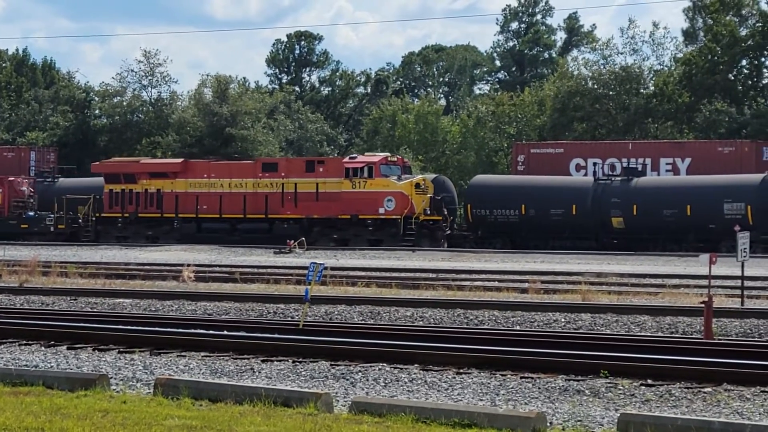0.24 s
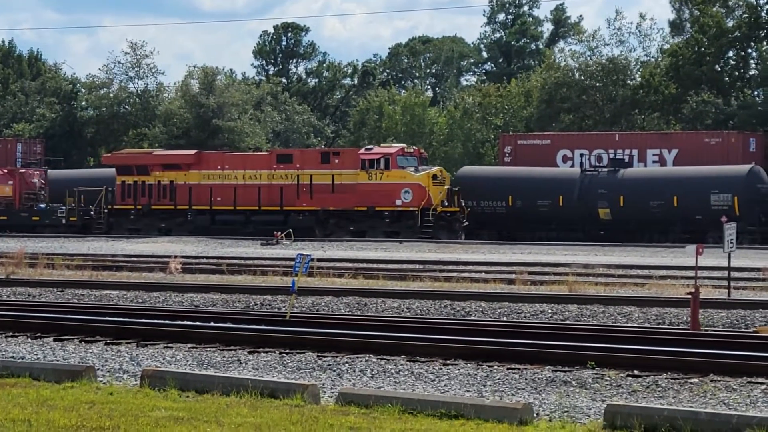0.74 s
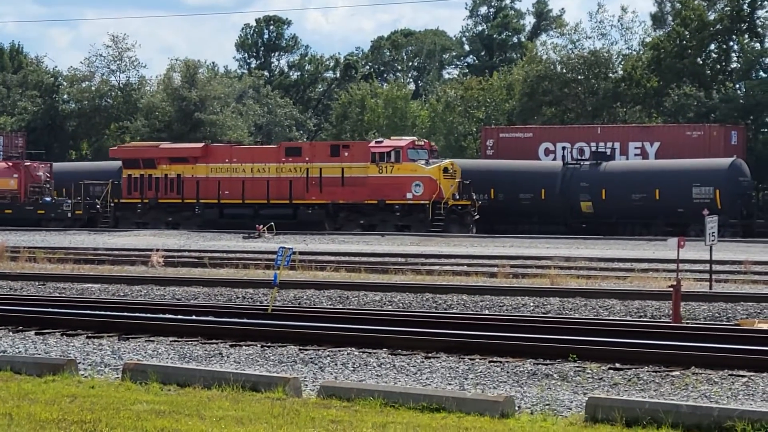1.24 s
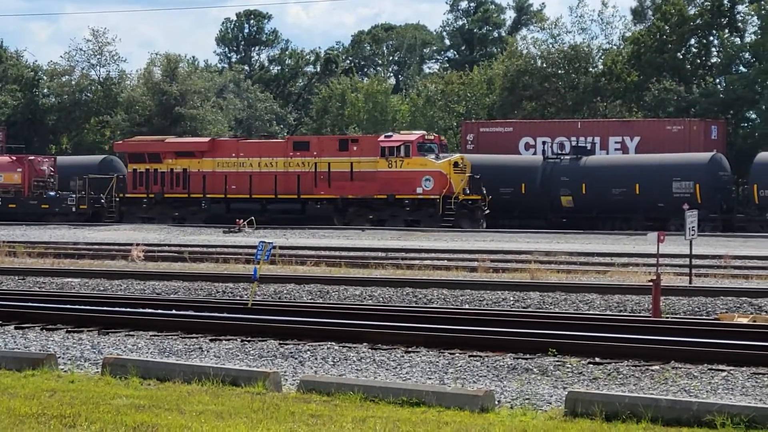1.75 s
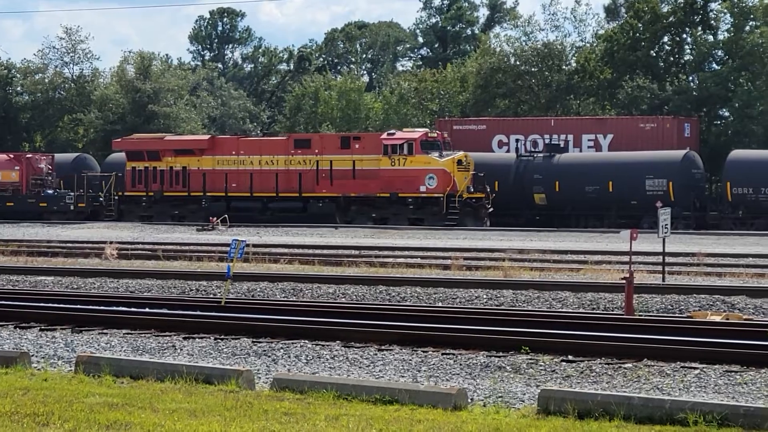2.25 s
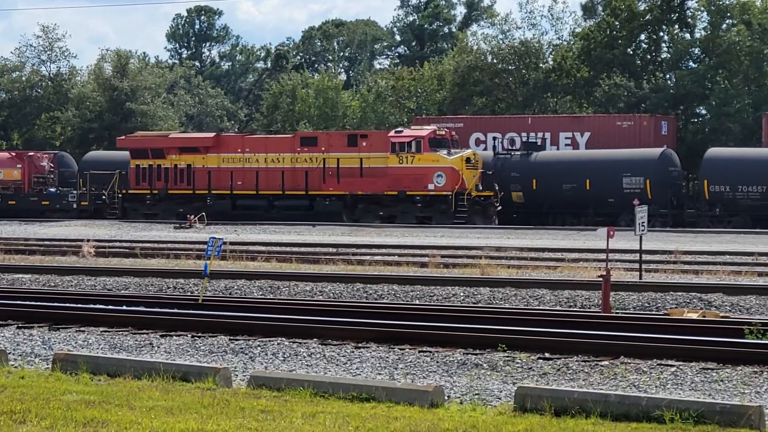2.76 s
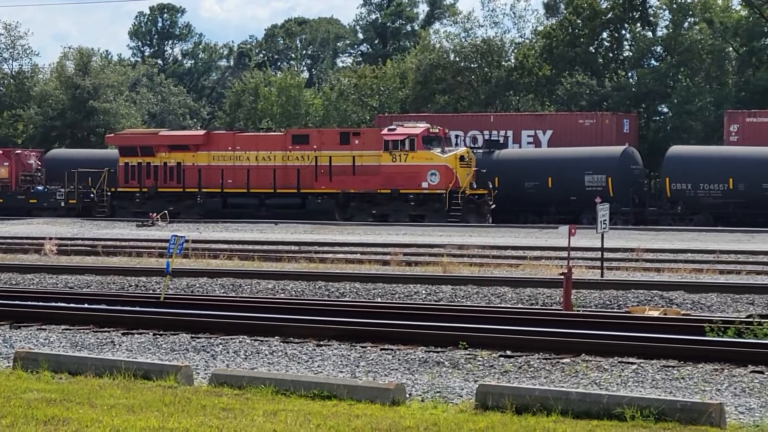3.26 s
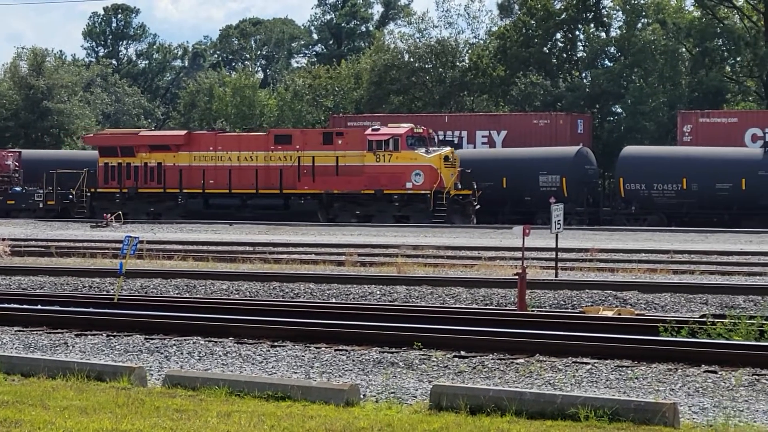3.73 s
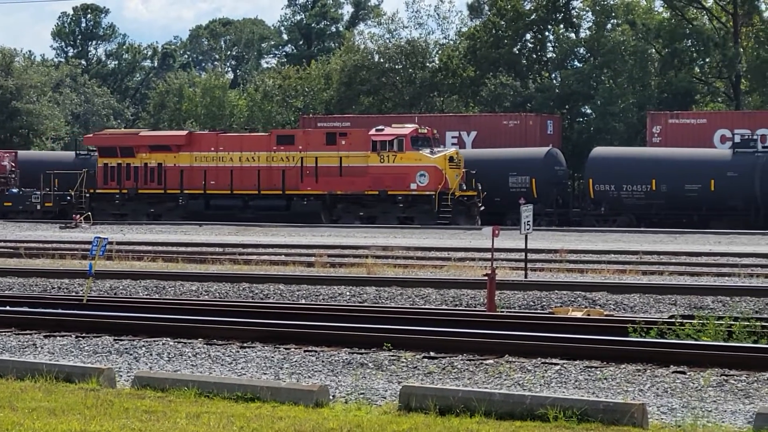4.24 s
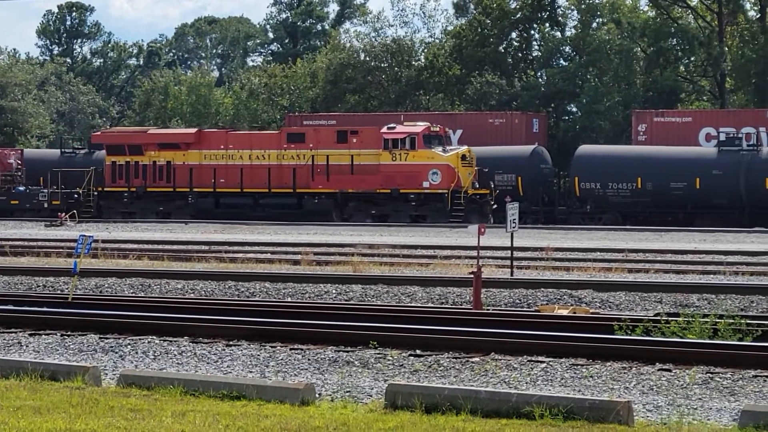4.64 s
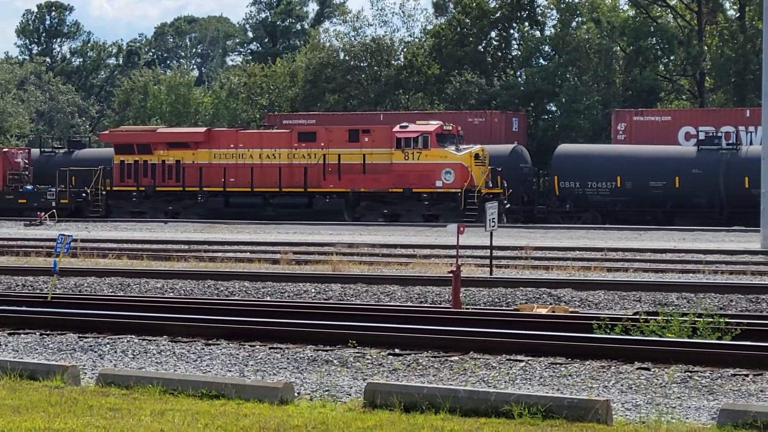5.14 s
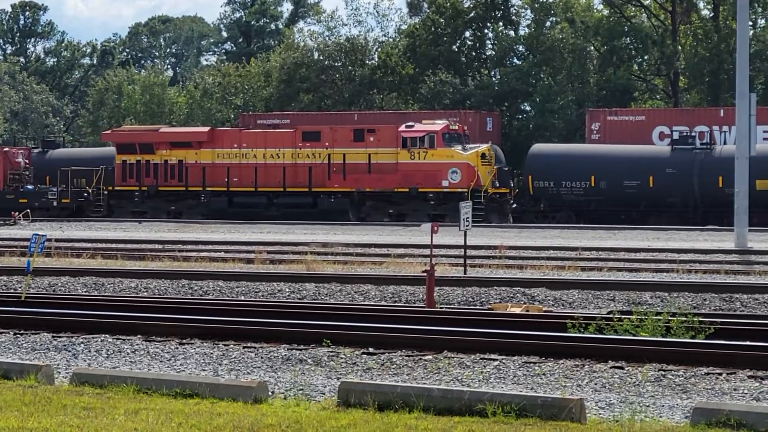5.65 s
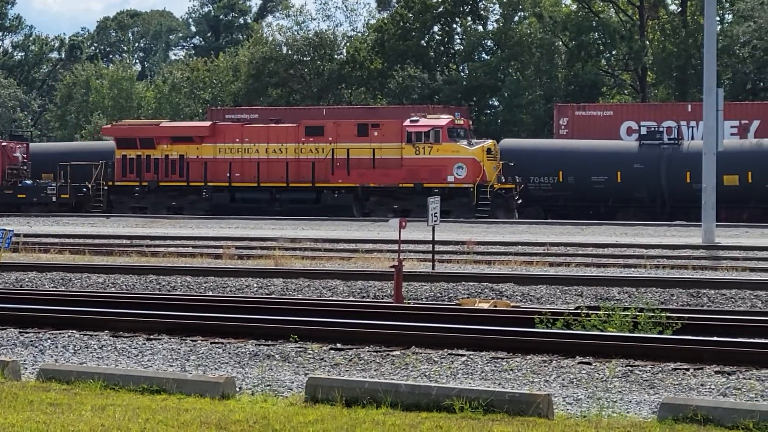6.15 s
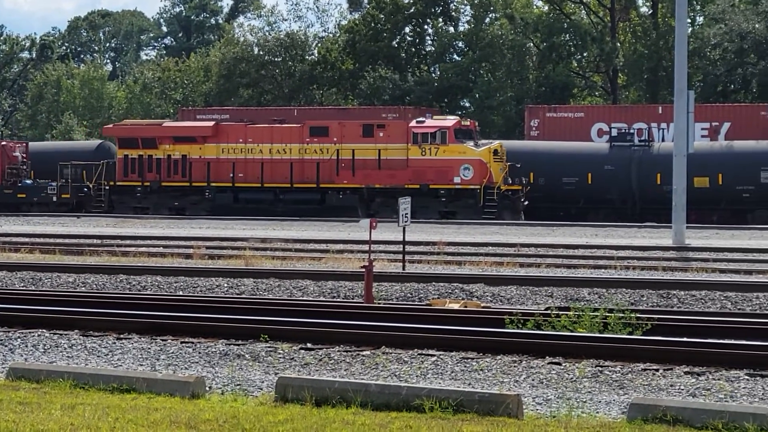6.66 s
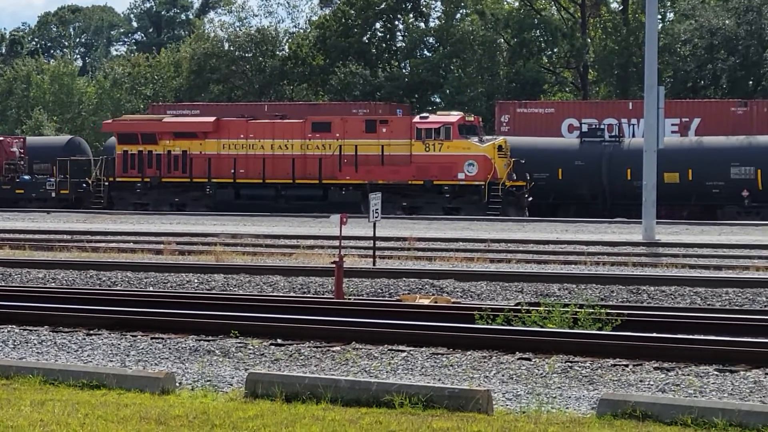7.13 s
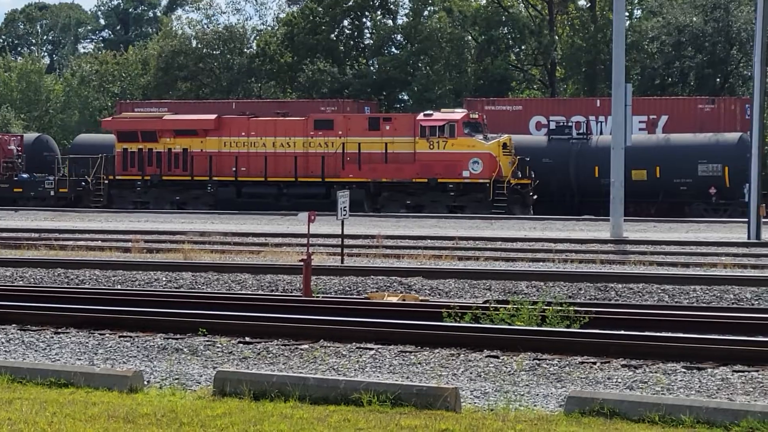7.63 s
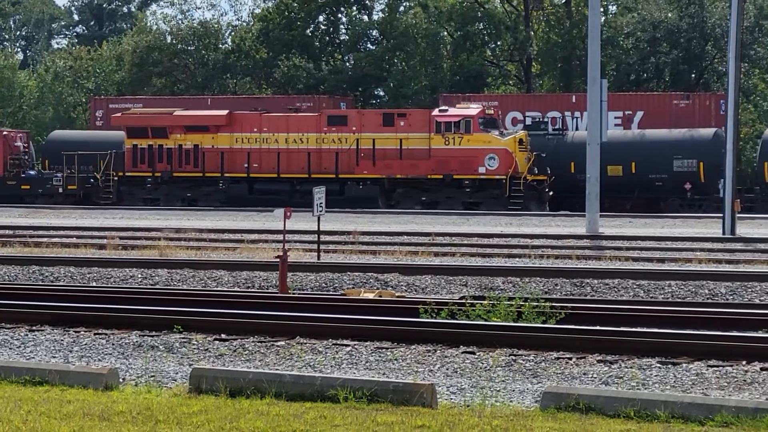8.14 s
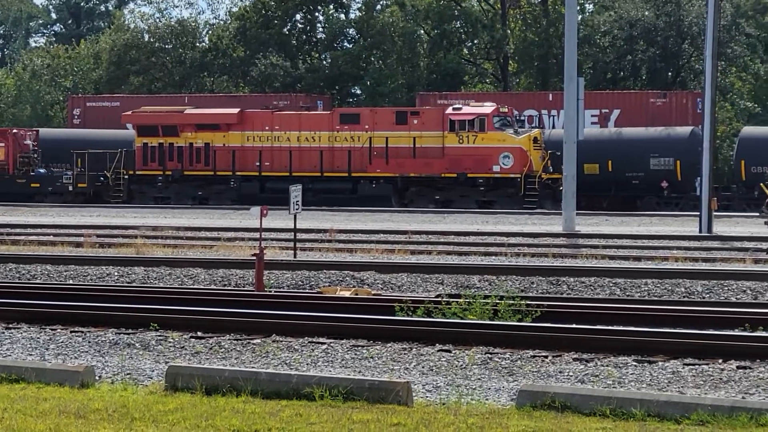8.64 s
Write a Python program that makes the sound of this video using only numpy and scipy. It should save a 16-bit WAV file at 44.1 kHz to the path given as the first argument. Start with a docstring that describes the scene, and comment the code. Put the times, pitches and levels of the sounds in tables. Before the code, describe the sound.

A rolling locomotive and a second diesel engine drone continuously, low and powerful, with uneven puffs about five cycles a second. Steady low hums and a pulsing, slowly climbing gear whine sit in the rumble, with rushing fans and mechanical clatter above. Brief faint flange squeaks come early, strongest around three seconds; a very faint insect hiss flickers on top. Open yard, wide stereo, no speech.

```python
"""In a rail yard, two twelve-cylinder diesel locomotives throb at slightly different speeds. The exhaust of
the rolling one is a train of puffs ringing its stack; it arrives by two paths whose difference grows, so its
strong tones swell and cancel in turn. Shaped noise makes the rumble, fan roar, engine clatter and hiss.
Wandering sines make the steady hums, the rising gear hum and faint wheel squeals; a chopped high hiss and
a thin tone make an insect in the grass."""
import sys
import numpy as np
from scipy import signal
from scipy.fft import rfft, irfft, next_fast_len
from scipy.io import wavfile
from scipy.ndimage import uniform_filter1d, map_coordinates

SR = 44100
rng = np.random.default_rng(int(sys.argv[2]) if len(sys.argv) > 2 else 0)


def wav_out(sig):
    """Save sig, one row per channel (or a flat mono array), as 16-bit PCM at SR to the path in sys.argv[1]."""
    wavfile.write(sys.argv[1], SR, np.round(np.clip(np.atleast_2d(sig).T, -1, 1) * 32767).astype(np.int16))


def invert_db(x):
    """Field ratio 10**(x/20) for x, a level in decibels (scalar or array-like)."""
    u = np.asarray(x, float) / 20
    return 10 ** u


N = 392049  # length in samples

# Cylinders of each engine in firing order: strength_db (relative), late_ms
ROLLING_CYLINDERS = [(0.1, 1.49), (6.6, 0.71), (-3.7, -4.09), (-3.5, 4.04), (-1.4, 2.04), (3.3, -1.15),
                     (-0.7, -5.69), (-4.1, 4.21), (0.8, 1.05), (3.9, 0.43), (-4.0, -2.6), (4.7, 4.74)]
SECOND_CYLINDERS = [(6.0, 4.04), (-3.2, 1.21), (-2.5, 3.05), (-5.6, -3.83), (-3.9, -1.48), (7.0, -3.6),
                    (3.3, -1.6), (0.5, -4.62), (-2.6, -2.12), (-6.6, 3.04), (-2.1, 2.36), (9.7, 2.16)]
# Ringing modes of each exhaust stack: centre_hz, width_hz, gain_db (relative)
ROLLING_STACK = [(68.7, 29.2, -47.9), (80.3, 47.6, -51.8), (129.2, 36.3, -70.3)]
SECOND_STACK = [(47.7, 18.0, -57.4), (77.1, 6.3, -49.5), (175.7, 12.4, -81.3)]
# The two ways the rolling exhaust arrives: time_s, short_path_db, long_path_ms, long_path_db
PATHS = [(0.0, 0.4, 36.68, 4.1), (0.99, 2.2, 37.29, 2.0), (1.98, 2.1, 38.35, 1.4), (2.97, -0.3, 39.0, -1.9),
         (3.96, 0.0, 39.78, -2.7), (4.94, -3.1, 41.17, 0.4), (5.93, -0.5, 43.39, -0.1),
         (6.92, -1.0, 45.24, 1.1), (7.91, 2.0, 46.57, 3.2), (8.9, 4.0, 49.05, 3.8)]
# Combustion knock of each cylinder in firing order: strength_db (relative)
KNOCK_STRENGTHS = [-9, -15, -5.5, -9.5, -16, -9, -0.5, -8, -16, -8, -15, -4.5]
# Noise colours, relative strength per hertz: pitch_hz, level_db
RUMBLE_COLOUR = [(68, -27.5), (106, -2), (119, -7.5), (130, -1), (172, -1), (186, -4), (226, -5.5),
                 (249, -7), (289, -15), (339, -19), (480, -28.5), (620, -63), (1060, -120)]
ROAR_COLOUR = [(260, -40), (440, -11), (583, -11.5), (619, -11.5), (726, -6.5), (865, -12.5), (984, -5.5),
               (1230, -8.5), (1420, -4.5), (1590, -10), (1860, -1.5), (2070, -8.5), (2360, -12),
               (2500, -19), (2700, -13.5), (3510, -34.5), (5940, -120)]
CLATTER_COLOUR = [(1470, -35), (2500, -15), (2730, -2.5), (2930, -3), (3180, -0.5), (3470, -3.5),
                  (4200, -4), (4470, -9), (4820, -4), (5300, -4.5), (6890, -30), (11700, -120)]
HISS_COLOUR = [(3060, -34), (5200, -6), (5780, 0), (7700, -8.5), (8450, -12.5), (9320, -24), (9800, -25.5),
               (12700, -54), (21600, -120)]
INSECT_COLOUR = [(8500, -34), (9600, -8), (11300, -3.5), (12000, -0.5), (12500, -2), (13500, 2),
                 (14000, -7), (14800, -8), (15650, -6), (16500, -39.5)]
# How alike left and right noise are, 1 being the same: pitch_hz, likeness (no unit)
LIKENESS = [(60, 0.66), (130, 1), (290, 0.95), (640, 0.48), (1410, 0.6), (3100, 0.7), (6820, 0.41),
            (15000, 0.27)]
# Panel resonances of the casings: centre_hz, width_hz, lift_db
CASING_PANELS = [(962, 63, 5), (1410, 22, 3.5), (1874, 39, 4.5), (2377, 40, 5), (3270, 120, 2),
                 (4755, 130, 5)]
# Treble level, drifting with the air over the yard: time_s, level_db (relative)
TREBLE_DRIFT = [(0, 0.5), (.4, 0), (.8, -.5), (1.42, 3), (1.65, 0), (1.9, -3), (2.7, -1), (3.5, -1.5),
                (3.7, -4), (4.1, .5), (4.4, 0), (5.5, 0.7), (6.5, 1), (7.5, 0), (8.89, 0)]
# Steady tones of the engine firing, fans and shafts: pitch_hz, level_db, waver_per_s
STEADY_HUMS = [(30, -35.5, 1.1), (111.5, -36.5, 1.2), (126.8, -37, 0.9), (165.4, -35.5, 1.6),
               (217.3, -36, 2.004), (232.9, -47, 1.8), (272.8, -46.5, 1.5), (313.3, -54, 1.5),
               (370.2, -54.5, 2), (465, -62.5, 2), (522.5, -61.5, 3), (633, -59, 5), (749, -58.5, 4.7),
               (1171, -55.5, 2.7)]
# Wheel flange notes: start_s, end_s, pitch_hz, level_db
FLANGE_NOTES = [(1.0, 1.25, 9650, -74), (1.33, 1.55, 9900, -75), (2.48, 3.1, 5670, -51.5),
                (2.68, 3.1, 7480, -61), (2.85, 3.08, 8330, -64), (2.42, 3.15, 9950, -77),
                (2.75, 3.1, 4870, -55), (3.15, 3.5, 10300, -76)]
# Colour difference of the microphone ports: pitch_hz, left_over_right_db
PORT_BALANCE = [(60, -1.0), (99, -1.0), (160, -0.5), (270, -1.0), (450, -1.0), (740, -1.5), (1220, -1.0),
                (2010, -0.5), (3330, 1.0), (5500, -2.6), (9080, 0.3), (15000, 3.5)]
# Phase difference of the microphone ports: pitch_hz, left_lead_radians
PORT_PHASE = [(1000, 0.25), (2300, 0.066), (3000, 1.45), (8500, 0.77), (11000, 1.2)]

# One cycle fires all twelve cylinders once
ROLLING_CYCLES_PER_S, ROLLING_FIRST_FIRING_S = 4.8654, 0.0668
SECOND_CYCLES_PER_S, SECOND_FIRST_FIRING_S = 4.8332, 0.1652


def unit(x):
    """Scales a sound to rms 1."""
    return x / np.sqrt(np.mean(x ** 2) + 1e-20)


def along(points, hz):
    """Reads a (pitch, value) curve on a logarithmic pitch axis."""
    pitch, value = np.transpose(points)
    return np.interp(np.log(hz + 1), np.log(pitch + 1), value)


def path(times, column):
    """Reads one column of the path table at the given times."""
    rows = np.array(PATHS)
    return np.interp(times, rows[:, 0], rows[:, column])


def level(start_db, db_per_s, drift_share):
    """Level of a layer in dB: a steady change as the engine nears, plus a share of the treble drift."""
    t = np.arange(N) / SR
    drift_s, drift_db = np.transpose(TREBLE_DRIFT)
    return start_db + db_per_s * t + drift_share * np.interp(t, drift_s, drift_db)


def wobble(knots_per_s):
    """A smooth random curve through evenly spaced random knots."""
    return map_coordinates(rng.standard_normal(200), [np.arange(N) * knots_per_s / SR])


def filtered(x, response):
    """Filters a sound by a (complex) response to frequency."""
    size = next_fast_len(N + SR // 2)
    spectrum = rfft(x, size) * response(np.fft.rfftfreq(size, 1 / SR))
    return irfft(spectrum, size)[..., :N]


def impulses(times, areas):
    """Places impulses of given area, each shared between the two nearest samples."""
    keep = (times >= 0) & (times < (N - 1) / SR)
    position, size = times[keep] * SR, areas[keep] * SR
    whole = position.astype(int)
    part = position - whole
    return np.bincount(whole, size * (1 - part), N) + np.bincount(whole + 1, size * part, N)


def rush(colour, patchy_db):
    """Stereo noise of rms 1, with random patches of gain over time and frequency."""
    noise = signal.stft(rng.standard_normal((2, N)), nperseg=512)[2]
    patches = uniform_filter1d(rng.standard_normal(noise.shape[1:]), size=2, axis=0)
    patches = uniform_filter1d(patches, size=8, axis=1)
    pair = signal.istft(noise * invert_db(patchy_db * unit(patches)), nperseg=512)[1][:, :N]

    def mid_and_side(hz):
        # this angle gives left and right the likeness in the table
        angle = np.arccos(np.clip(along(LIKENESS, hz), -1, 1)) / 2
        return invert_db(along(colour, hz)) * [np.cos(angle), np.sin(angle)]

    mid, side = filtered(pair, mid_and_side)
    return unit(np.array([mid + side, mid - side]))


def tone(hz, db, waver_per_s, depth_db=2.5):
    """A sine around the given rms level, whose level and phase wander."""
    turns = np.cumsum(hz * np.ones(N)) / SR + rng.random() + 0.099 * wobble(waver_per_s)
    loudness = np.sqrt(2) * invert_db(db + depth_db * wobble(waver_per_s))
    return loudness * np.sin(2 * np.pi * turns)


def even_firings(cycles_per_s, first_s):
    """Times of evenly spaced firings, one row a cycle, from the cycle before the first."""
    cycle = np.arange(-1, 45)[:, None]
    return first_s + (cycle + np.arange(12) / 12) / cycles_per_s


def exhaust_puffs(even, cylinders):
    """One puff a firing: each cylinder has its strength and timing, each puff a little scatter."""
    strength_db, late_ms = np.transpose(cylinders)
    jitter, scatter = rng.standard_normal((2,) + even.shape)
    times = even + (late_ms + 0.1 * jitter) / 1000
    return times.ravel(), invert_db(strength_db + 0.4 * scatter).ravel()


def stack(puffs, modes, low_cut_hz, high_cut_hz=250):
    """The stack rings in three modes and radiates little bass; the silencer removes the crack."""
    def response(f):
        ring = 0
        for k, (centre, width, db) in enumerate(modes):
            damping = 1j * f * width
            # neighbouring modes have opposite signs
            ring = ring + (-1) ** k * invert_db(db) * damping / (centre ** 2 - f ** 2 + damping)
        radiated = (1j * f / (low_cut_hz + 1j * f)) ** 3
        return ring * radiated / (1 + (f / high_cut_hz) ** 6)

    return filtered(puffs, response)


def rolling_exhaust():
    """The rolling engine's puffs arrive by a short and a long path, then ring its stack."""
    even = even_firings(ROLLING_CYCLES_PER_S, ROLLING_FIRST_FIRING_S)
    times, sizes = exhaust_puffs(even, ROLLING_CYLINDERS)
    short_path_ms = 0.23
    short = impulses(times + short_path_ms / 1000, sizes * invert_db(path(times, 1)))
    long = impulses(times + path(times, 2) / 1000, sizes * invert_db(path(times, 3)))
    left_right_db = [[0.5], [0.3]]
    return stack(short + long, ROLLING_STACK, low_cut_hz=23.8) * invert_db(left_right_db)


def second_exhaust():
    """The second engine's puffs ring its own stack and arrive by one path."""
    even = even_firings(SECOND_CYCLES_PER_S, SECOND_FIRST_FIRING_S)
    times, sizes = exhaust_puffs(even, SECOND_CYLINDERS)
    left_right_db = [[-0.1], [0.7]]
    return stack(impulses(times, sizes), SECOND_STACK, low_cut_hz=22) * invert_db(left_right_db)


def knocking(lead_ms=19, decay_ms=4.6, scatter_db=2.5):
    """Combustion knocks of the rolling engine as a loudness curve of mean 1, ahead of its long path."""
    even = even_firings(ROLLING_CYCLES_PER_S, ROLLING_FIRST_FIRING_S)
    sizes = invert_db(KNOCK_STRENGTHS + scatter_db * rng.standard_normal(even.shape))
    times = even + (path(even, 2) - lead_ms) / 1000
    hits = impulses(times.ravel(), sizes.ravel())
    # three equal smoothing stages round each hit into a short swell
    curve = filtered(hits, lambda f: 1 / (1 + 2j * np.pi * f * decay_ms / 1000) ** 3)
    return curve / curve.mean()


def rumble():
    """Low noise of bodies and wheels."""
    return invert_db(level(-29.5, db_per_s=0.44, drift_share=0.2)) * rush(RUMBLE_COLOUR, patchy_db=1.04)


def roar(knock):
    """Mid-range noise of the fans, flaring slightly with every knock."""
    noise = unit(rush(ROAR_COLOUR, patchy_db=2.0) * (1 + 0.1 * knock))
    return invert_db(level(-36.5, db_per_s=0.14, drift_share=0.28) + 0.4 * wobble(6)) * noise


def clatter(knock):
    """Engine clatter: brighter noise flaring with every knock."""
    noise = unit(rush(CLATTER_COLOUR, patchy_db=2.0) * (1 + 0.38 * knock))
    return invert_db(level(-40.5, db_per_s=0.03, drift_share=1) + 0.39 * wobble(8)) * noise


def hiss(knock):
    """Treble noise flaring with every knock."""
    noise = unit(rush(HISS_COLOUR, patchy_db=2.5) * (1 + 0.35 * knock))
    return invert_db(level(-46, db_per_s=0.03, drift_share=1.3) + 0.49 * wobble(8.3)) * noise


def casing(sound):
    """Casing panels resonate, lifting narrow bands of the sound."""
    def response(f):
        lift_db = sum(db / (1 + (2 * (f - hz) / width) ** 2) for hz, width, db in CASING_PANELS)
        return invert_db(lift_db)

    return filtered(sound, response)


def machinery():
    """Rumble, roar and clatter through the casings, and hiss; one train of knocks drives the flares."""
    knock = knocking()
    return rumble() + casing(roar(knock) + clatter(knock)) + hiss(knock)


def steady_hums():
    """Engine firing, turning fans and shafts give steady tones that waver."""
    return sum(tone(*row) for row in STEADY_HUMS)


def gear_hum():
    """Two gear pairs rise steadily in pitch, swelling regularly."""
    t = np.arange(N) / SR
    hz = 172.4 + 1.95 * t
    swell_db, swell_period_s, swell_peak_s = 2, 0.95, 6.35
    swell = swell_db * np.cos(2 * np.pi * (t - swell_peak_s) / swell_period_s)
    db = -31 + 0.2857 * t + swell
    first_pair = tone(hz, db, 6, depth_db=2.0)
    second_pair = tone(1.55 * hz, db - 14.5, 3, depth_db=2.0)
    return first_pair + second_pair


def insect():
    """High flickering hiss, partly chopped by an insect's wing strokes, and a note that grows clearer."""
    strokes_per_s = 36.67
    stroke = np.exp(1.5 * np.cos(2 * np.pi * strokes_per_s * np.arange(N) / SR))
    noise = unit(rush(INSECT_COLOUR, patchy_db=0.5) * (1 + 0.15 * stroke))
    high_hiss = invert_db(level(-60.5, db_per_s=0.01, drift_share=0.4) + 0.6 * wobble(12)) * noise
    note = tone(11990, level(-86.5, db_per_s=0.9, drift_share=0.1), 18, depth_db=3)
    return high_hiss + note


def wheel_squeals():
    """Wheel flanges sing for a moment, in short wavering notes with 0.08 s fades."""
    t = np.arange(N) / SR
    total = np.zeros(N)
    for start, end, hz, db in FLANGE_NOTES:
        fade = np.clip(np.minimum(t - start, end - t) / 0.08, 0, 1)
        total += fade * tone(hz, db, 14, depth_db=3.3)
    return total


def scene():
    """Adds up every sound in the yard, in stereo."""
    exhausts = rolling_exhaust() + second_exhaust()
    return exhausts + machinery() + steady_hums() + gear_hum() + insect() + wheel_squeals()


def band_limit(x):
    """A steep low-pass at the top of the band."""
    return signal.sosfilt(signal.butter(12, 15760, fs=SR, output="sos"), x)


def record(dry):
    """Two microphone ports differ in colour and phase; the loudest throbs are rounded off near full scale."""
    def ports_response(hz):
        # each port takes half of the difference
        tilt = invert_db(along(PORT_BALANCE, hz) / 2) * np.exp(0.5j * along(PORT_PHASE, hz))
        return np.array([tilt, 1 / tilt])

    ports = filtered(dry, ports_response)
    rounded = ports / (1 + np.abs(ports / 1.01) ** 30) ** (1 / 30)
    return band_limit(rounded)


dry = scene()
out = record(dry)
wav_out(out)
```